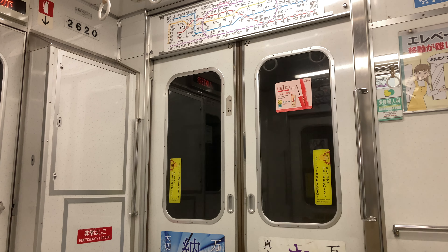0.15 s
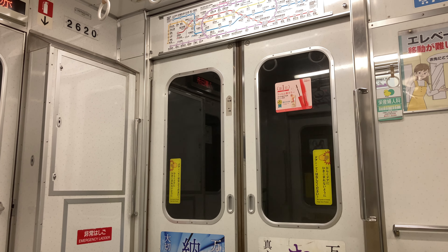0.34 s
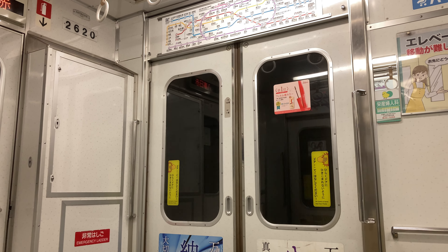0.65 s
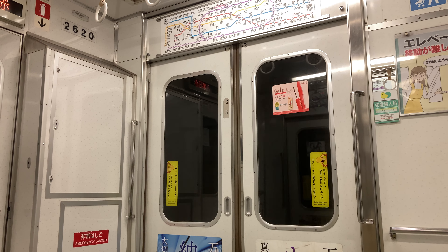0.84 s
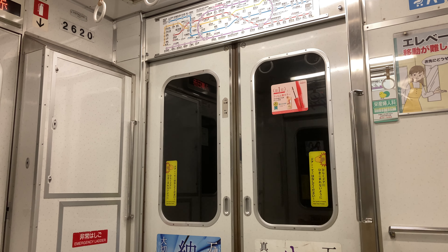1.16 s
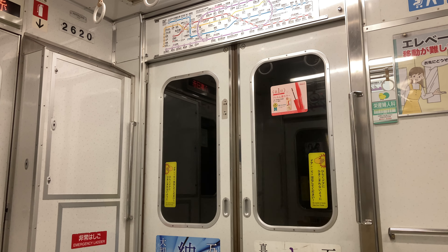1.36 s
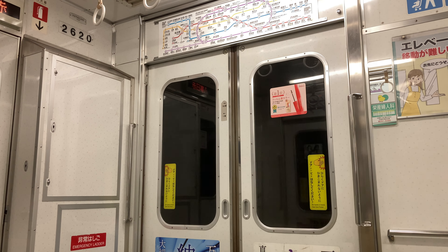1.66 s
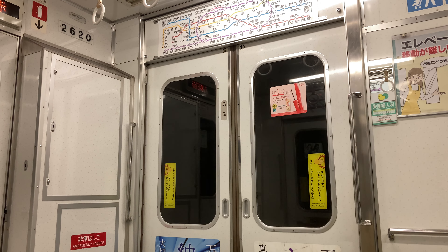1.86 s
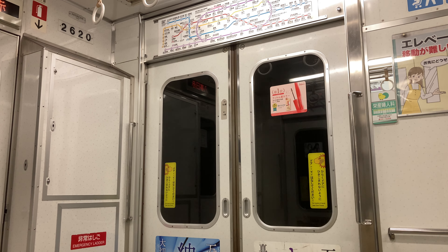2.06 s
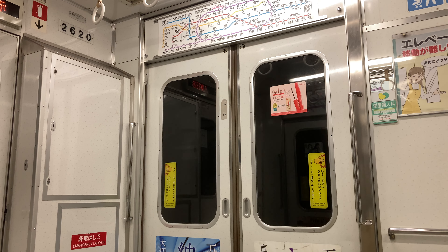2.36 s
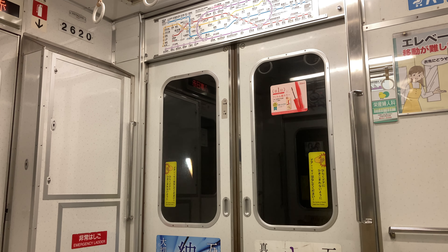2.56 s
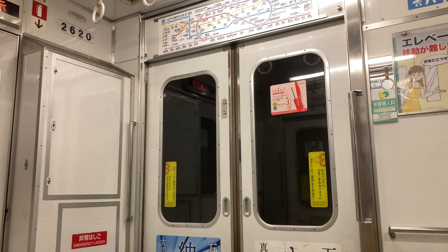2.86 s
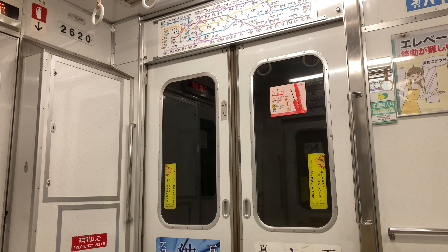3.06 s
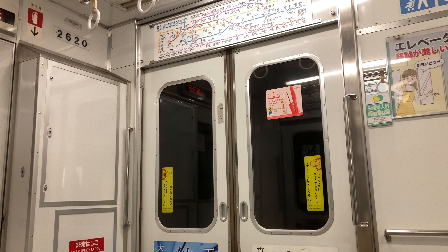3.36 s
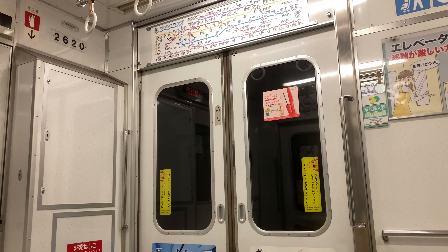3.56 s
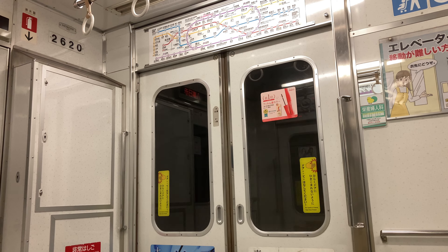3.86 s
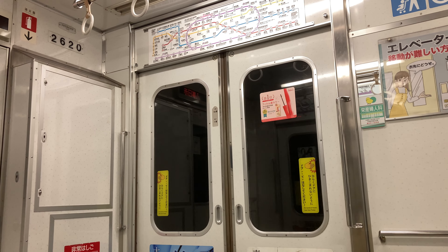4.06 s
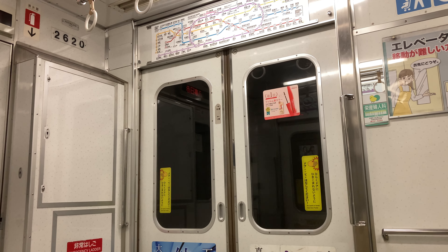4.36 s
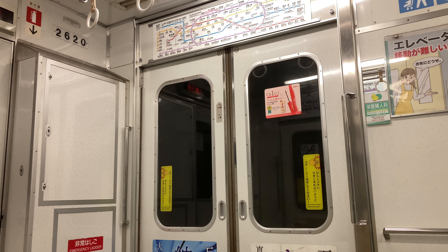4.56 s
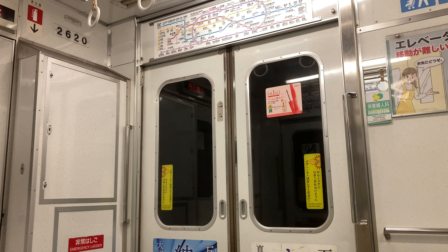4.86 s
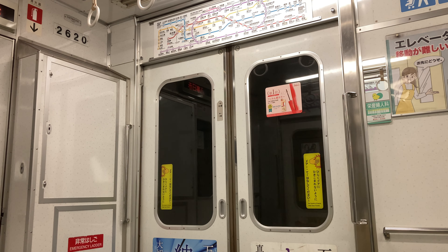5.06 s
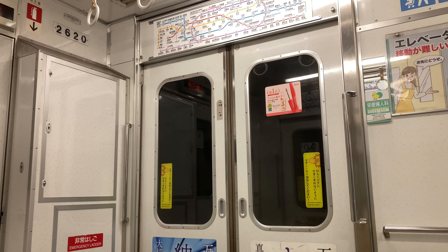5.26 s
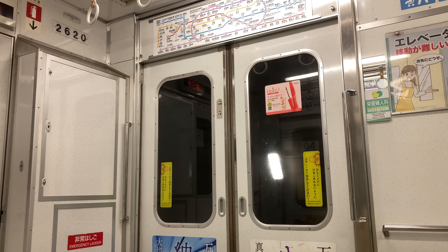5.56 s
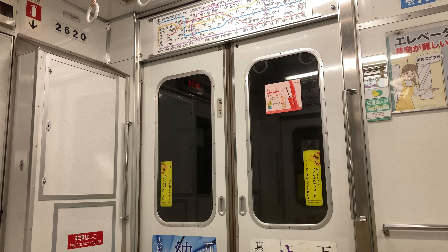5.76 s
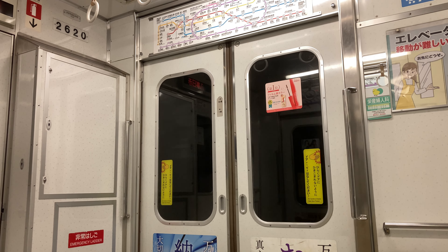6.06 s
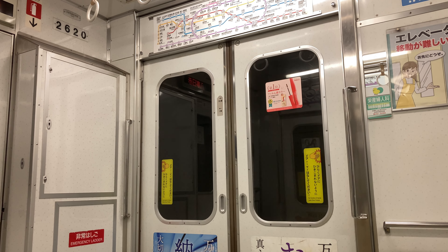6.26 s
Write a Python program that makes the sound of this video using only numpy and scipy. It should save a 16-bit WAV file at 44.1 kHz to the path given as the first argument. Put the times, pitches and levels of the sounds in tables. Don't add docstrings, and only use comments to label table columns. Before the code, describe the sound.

Low train rumble and wheel roar with double thumps on rail joints, while faint piercing squeals glide and throb, then a light metal ting.

```python
import sys
import numpy as np
from scipy import signal
from scipy.fft import rfft, irfft
from scipy.io import wavfile
from scipy.ndimage import uniform_filter1d, map_coordinates

SR = 44100
rng = np.random.default_rng(int(sys.argv[2]) if len(sys.argv) > 2 else 0)


def voltage_ratio(level):
    return 10 ** (np.asarray(level, float) / 20)


def wrap_up_sound(samples):
    columns = np.atleast_2d(samples).T
    tamed = np.clip(columns, -1, 1)
    steps = np.round(tamed * 32767).astype(np.int16)
    wavfile.write(sys.argv[1], SR, steps)


N = 283122


def in_time(rows):
    s, *columns = np.transpose(rows)
    return [np.interp(np.arange(N) / SR, s, column) for column in columns]


def at_hz(points):
    hz, value = np.transpose(points)
    return np.interp(np.log(np.fft.rfftfreq(N, 1 / SR) + 1), np.log(hz), value)


def rms_one(x):
    return x / np.sqrt(np.mean(x ** 2) + 1e-20)


def slow(hz):
    r = np.exp(-2 * np.pi * hz / SR)
    settle = 8000
    noise = rng.standard_normal(N + settle)
    return rms_one(signal.lfilter([1], [1, -2 * r, r * r], noise)[settle:])


def wobble(width_hz):
    return slow(width_hz) + 1j * slow(width_hz)


def band_at(hz, rough):
    turn = 2 * np.pi * np.cumsum(hz * np.ones(N)) / SR
    return rough.real * np.cos(turn) - rough.imag * np.sin(turn)


def blow(s, rise_s, t60):
    out, start = np.zeros(N), int(s * SR)
    t = np.arange(min(int(1.5 * t60 * SR), N - start)) / SR
    out[start:start + len(t)] = (1 - np.exp(-t / rise_s)) * voltage_ratio(-60 * t / t60)
    return out


# (pitch [Hz], left minus right [dB])
BALANCE = [(60, -4.5), (110, -5), (200, -1.5), (380, -1), (700, 2), (1290, 0.5), (2380, 0.5), (4400, -1.5),
           (8120, -2), (15000, 1.5)]


def at_ports(common, apart=0, turn=0, offset_hz=330):
    hz = np.fft.rfftfreq(N, 1 / SR)
    shared_above_hz, lead_samples = 6500, 9.42
    early = -np.exp(2j * np.pi * (hz + offset_hz) * lead_samples / SR)
    right_phase = np.where(hz > shared_above_hz, early, np.exp(1j * turn))
    half = voltage_ratio(at_hz(BALANCE) / 2)
    left = irfft((common + apart) * half, N)
    right = irfft((common - apart) * right_phase / half, N)
    return np.array([left, right])


# (pitch [Hz], likeness [0-1])
LIKENESS = [(60, 0.97), (130, 0.9), (290, 0.69), (480, 0.54), (640, 0.25), (1000, 0.18), (2500, 0.096),
            (3400, 0.061), (4200, 0.12), (4900, 0.041), (5700, 0.39), (6400, 0.11), (7100, 0.58),
            (8800, 0.83)]
# (pitch [Hz], right phase [rad])
RIGHT_TURN = [(60, 0), (500, -.4), (700, -2.0), (1100, -3.2), (2200, -5.5), (3000, -7.3), (3700, -5.5),
              (4300, -5.0), (5000, -3.0), (6300, -3.2)]


def diffuse(spectrum):
    colour = voltage_ratio(at_hz([(10, -104)] + spectrum + [(22000, -70)]))
    mid, side = rfft(rng.standard_normal((2, N))) * colour
    alike = np.clip(at_hz(LIKENESS), -1, 1)
    return rms_one(at_ports(np.sqrt(1 + alike) * mid, np.sqrt(1 - alike) * side, at_hz(RIGHT_TURN)))


# (pitch [Hz], density [dB per Hz])
BOOM = [(22, -20), (45, -15.5), (62, -8), (85, 0), (115, -6), (155, -0.5), (205, 0.5), (235, 0.5),
        (270, -35.5), (330, -23)]
# (pitch [Hz], density [dB per Hz])
ROAR = [(200, -18), (270, 2.5), (340, -1.5), (430, -3), (520, -5.5), (600, -11.5), (700, -12.5),
        (850, -15.5), (1600, -22.5)]
# (pitch [Hz], density [dB per Hz])
HISS = [(700, -2), (1100, -2), (1750, -3.5), (2100, -0.5), (2600, -3), (3150, -6), (3500, -11.5),
        (5000, -15.5), (5800, -27.5), (6800, -24), (7600, -59)]
# (pitch [Hz], density [dB per Hz])
AIR = [(6000, -3.5), (7200, -3.5), (9000, -4), (11000, -9.5), (12400, -8), (13000, -5), (13800, -12),
       (16000, -13)]
# (time [s], level [dB])
VIGOUR = [(0.0, -38), (2.14, -40), (2.34, -40), (2.93, -41.5), (3.22, -40), (5.31, -44), (5.72, -42.5),
          (6.01, -44.5), (6.42, -42.5)]
# (time [s], level [dB])
SHAKE = [(0.0, -15), (0.27, -28), (0.34, -26), (0.77, -27.5), (1.0, -21), (1.82, -24.5), (1.84, -21.5),
         (2.13, -21.5), (2.25, -11), (2.59, -26.5), (3.68, -15.5), (4.49, -29), (4.74, -18.5),
         (5.06, -29.5), (6.4, -20), (6.42, -25)]


def rolling():
    swing = in_time(VIGOUR)[0]
    swing = swing - swing.mean()
    shake = in_time(SHAKE)[0]
    shake = shake - shake.mean()
    boom = voltage_ratio(-21.5 + 0.27 * shake + 0.4 * slow(36)) * diffuse(BOOM)
    roar = voltage_ratio(-28.5 + 0.91 * swing + 1.13 * slow(14)) * diffuse(ROAR)
    hiss = voltage_ratio(-39 + 0.8 * swing + 1.12 * slow(23)) * diffuse(HISS)
    air = voltage_ratio(-61.5 + 0.51 * swing) * diffuse(AIR)
    return boom + roar + hiss + air


# (time [s], thud level [dB], clatter level [dB])
JOINTS = [(0.189, -19.5, -54), (0.319, -20.5, -39.5), (.44, -31.5, -74), (.98, -21, -56),
          (1.17, -30, -49.5), (1.42, -24, -69), (2.183, -17.5, -44), (2.335, -18, -41), (3.116, -23.5, -41),
          (3.32, -32, -46), (3.72, -28, -63), (4.525, -20, -45), (4.69, -20.5, -42.5), (5.53, -21.5, -52),
          (5.75, -30.5, -48.5), (6.1, -28.5, -50)]
# (pitch [Hz], density [dB per Hz])
THUD = [(120, -34), (210, 3), (270, 0), (350, 4), (440, 1), (560, -17.5), (750, -7.5), (1000, -34.5)]
# (pitch [Hz], density [dB per Hz])
CLATTER = [(600, -48), (900, 12), (1450, 5.5), (2000, -2.5), (3200, -4), (5500, -12), (8000, -23.5),
           (12000, -29)]


def joints():
    thud = sum(voltage_ratio(db + 1) * blow(s, 0.01, 0.85) for s, db, _ in JOINTS)
    clatter = sum(voltage_ratio(db + 9.5) * blow(s, 0.02, 0.75) for s, _, db in JOINTS)
    heave = voltage_ratio(-7) * diffuse(BOOM)
    return thud * (diffuse(THUD) + heave) + clatter * diffuse(CLATTER)


# (time [s], peak level [dB], pitch [Hz])
KNOCKS = [(0.174, -10, 191), (0.294, -11, 196), (0.361, -10, 328), (0.436, -7, 215), (0.976, -5, 213),
          (2.19, -19, 363), (2.236, -4, 361), (2.322, -8, 188), (2.394, -6, 213), (3.117, -10, 186),
          (3.685, -11, 226), (4.537, -3, 240), (4.599, -9, 433), (4.705, -10, 172), (4.754, -7, 226)]


def knocks():
    t = np.arange(N) / SR
    out = np.zeros(N)
    for s, db, hz in KNOCKS:
        out += voltage_ratio(db - 5) * blow(s, 0.006, 0.15) * np.sin(2 * np.pi * hz * (t - s))
    return out


# (time [s], pitch [Hz], level [dB], t60 [s])
FLOOR_RINGS = [(.3, 225, -17.5, 1), (.35, 318, -20.5, 0.75), (1.0, 212.7, -21.5, 0.56),
               (1.83, 240, -22.5, 0.96), (2.189, 354.3, -17.5, 0.49), (2.38, 351.3, -25, 0.8),
               (3.12, 330, -22, 0.46), (4.541, 404, -30, 0.61), (4.72, 351, -31.5, 0.59),
               (5.555, 321, -21, 0.26), (6.1, 150, -24, 0.95)]


def floor_rings():
    clean = 1 + 0.3 * wobble(30)
    return sum(voltage_ratio(db + 4) * blow(s, 0.006, t60) * band_at(hz, clean) for s, hz, db, t60 in FLOOR_RINGS)


# (time [s], pitch [Hz], level [dB], t60 [s])
WHEEL_RINGS = [(.17, 9200, -64, .3), (.33, 1950, -50, .6), (.335, 3400, -54, .4), (.34, 7800, -63, .3),
               (.35, 4300, -60, .3), (.3, 2600, -52, .5), (.88, 2650, -50, .4), (2.25, 2650, -49, .3),
               (2.33, 1450, -48, .6), (2.4, 800, -44, .4), (3.118, 700, -43, .3), (.98, 550, -38, .5),
               (4.527, 650, -38, .5), (.385, 650, -37, .3), (2.38, 6000, -64, .25), (2.98, 2450, -48, .2),
               (5.91, 10600, -67, .2)]


def wheel_rings():
    noisy = wobble(110)
    return sum(voltage_ratio(db + 10.5) * blow(s, 0.002, t60) * band_at(hz, noisy) for s, hz, db, t60 in WHEEL_RINGS)


EDGE_S = 0.05


def contact(start, end):
    t = np.arange(N) / SR
    inside = np.minimum(t - start, end - t) / EDGE_S
    return voltage_ratio(16 * np.clip(inside - 1, -4, 0))


# (time [s], pitch [Hz], level [dB])
SQUEALS = [
    [(0.35, 12400, -70), (0.424, 12800, -45), (0.458, 12730, -53), (0.488, 12800, -46), (0.572, 12640, -48),
     (0.63, 12300, -61), (0.652, 12370, -45), (0.788, 11900, -67), (0.8, 12100, -53)],
    [(0.8, 11940, -54), (0.806, 12000, -49), (0.886, 11380, -49.5), (1.01, 12030, -49.5),
     (1.038, 12400, -38), (1.05, 12600, -40), (1.06, 12400, -36.5), (1.128, 12700, -44.5),
     (1.22, 12700, -61)],
    [(1.37, 12500, -66), (1.404, 12600, -50), (1.488, 12100, -43.5), (1.576, 12000, -49),
     (1.65, 11500, -46), (1.67, 11460, -50), (1.76, 12100, -43), (1.776, 12270, -38), (1.98, 12900, -55.5)],
    [(2.36, 11700, -62), (2.402, 12300, -62), (2.44, 12230, -41.5), (2.48, 12100, -53),
     (2.514, 12100, -43.5), (2.59, 12000, -49), (2.6, 11900, -43.5), (2.738, 12330, -51),
     (2.82, 12200, -67)],
    [(3.04, 12400, -75), (3.098, 12400, -43), (3.108, 12300, -56), (3.152, 11900, -40), (3.162, 11900, -53),
     (3.172, 11900, -39), (3.216, 11900, -56), (3.246, 11400, -56), (3.4, 11400, -75)],
]


def squeals(rough):
    out = np.zeros(N)
    for rows in SQUEALS:
        hz, db = in_time(rows)
        held = contact(rows[0][0] - EDGE_S, rows[-1][0] + EDGE_S)
        out += voltage_ratio(db + 1.5) * held * band_at(hz, rough)
    return out


# (start [s], end [s], pitch [Hz], level [dB])
RUBS = [(-.1, .19, 12000, -51), (.25, .4, 14400, -66), (.73, .82, 14250, -62), (1.12, 1.22, 14050, -56),
        (1.17, 1.32, 15600, -52), (1.3, 1.5, 15300, -56), (3.56, 3.8, 13900, -58), (3.6, 3.74, 14650, -62),
        (3.72, 4.26, 14250, -57), (4.1, 4.3, 14700, -61), (3.66, 3.78, 11750, -63),
        (3.87, 4.19, 15600, -65), (3.95, 4.15, 12950, -52), (2.76, 3.12, 9420, -50),
        (3.16, 3.54, 9420, -47)]


def rubs(rough):
    return sum(voltage_ratio(db) * contact(start, end) * band_at(hz, rough) for start, end, hz, db in RUBS)


# (time [s], peak level [dB])
THROBS = [(2.35, -38), (2.765, -37), (2.875, -50), (2.96, -34), (3.079, -34), (3.175, -38), (3.285, -40),
          (3.405, -42)]


def throbs():
    grips = sum(voltage_ratio(db - 9) * blow(s, 0.0055, 0.4) for s, db in THROBS)
    rough = wobble(140) + voltage_ratio(-10) * wobble(450)
    return grips * band_at(9420, rough) * voltage_ratio(2 * slow(34))


def tunnel(x, t60, direct_db):
    t = np.arange(SR // 2) / SR
    tail = rng.standard_normal(len(t)) * voltage_ratio(-60 * t / t60)
    tail[0] += voltage_ratio(direct_db) * np.sqrt(np.sum(tail ** 2))
    return signal.fftconvolve(x, tail / np.sqrt(np.sum(tail ** 2)))[:N]


def flanges():
    flutter = voltage_ratio(np.clip(2.4 * slow(30), -12, 4.5))
    rough = (wobble(130) + voltage_ratio(-7) * wobble(550)) * flutter
    return tunnel(squeals(rough) + rubs(rough) + throbs(), t60=0.12, direct_db=9)


# (pitch [Hz], level [dB], t60 [s])
CHIME = [(3554, -13.5, 3), (5335, -13, .4), (7370, 1.5, 0.28), (9726, 0, 0.17), (10220, -8, .19),
         (10400, -18, .2), (12280, -14, .25), (12900, -16, .1), (14920, -22, .2), (15150, -9, 0.2)]


def chime():
    t = np.arange(N) / SR
    tap_s, held_s = 5.337, 0.2
    modes = np.zeros(N)
    for hz, db, t60 in CHIME:
        rise_s = 0.03 if hz < 6000 else 0.012
        modes += voltage_ratio(db) * blow(tap_s, rise_s, t60) * np.sin(2 * np.pi * hz * t)
    touch = voltage_ratio(-150 * np.clip(t - tap_s - held_s, 0, 1))
    tick = voltage_ratio(-8) * blow(tap_s, 0.003, 0.1) * np.diff(rng.standard_normal(N + 1))
    return voltage_ratio(-34) * (modes * touch + tick)


# (time [s], level [dB])
WHISTLE = [(3.5, -95), (3.7, -57), (4.8, -74), (5.5, -72), (6.42, -68)]


def whistle():
    return voltage_ratio(in_time(WHISTLE)[0]) * band_at(9000, wobble(200))


def mottled(x, depth_db, span_hz, span_s):
    hz, s, cells = signal.stft(x, SR, nperseg=1024)
    coarse = rng.standard_normal((400, 200))
    at = np.meshgrid(hz / span_hz % 398, s / span_s % 198, indexing="ij")
    patches = voltage_ratio(depth_db * map_coordinates(coarse, at, order=1))
    return signal.istft(cells * patches, SR)[1][:, :N]


def scene():
    around = mottled(rolling() + joints(), depth_db=2, span_hz=81.05, span_s=0.07)
    near = knocks() + floor_rings() + wheel_rings() + chime() + whistle()
    below = at_ports(rfft(flanges()), offset_hz=520)
    return around + at_ports(rfft(near)) + below


def top_cut(x):
    return signal.sosfilt(signal.butter(12, 15850, fs=SR, output="sos"), x)


def record(dry):
    rounded = 0.75 * np.tanh(dry / 0.75)
    hz, s, cells = signal.stft(rounded, SR, nperseg=2048)
    power = uniform_filter1d(np.mean(np.abs(cells) ** 2, axis=0), size=24, axis=0)
    loudest = np.maximum.accumulate(power * (hz[:, None] > 10500), axis=0)
    kept = power > loudest * voltage_ratio(2 * -17)
    mix = signal.istft(cells * kept, SR)[1][:, :N]
    return top_cut(mix)


dry = scene()
out = record(dry)
wrap_up_sound(out)
```